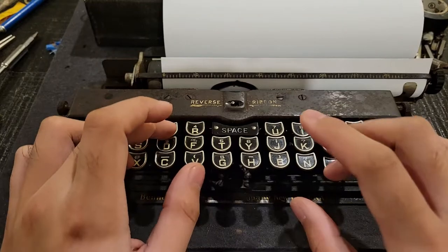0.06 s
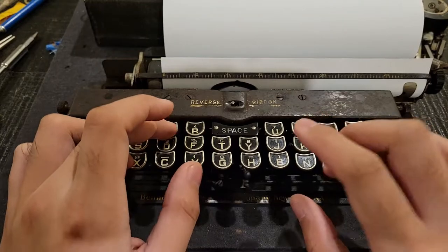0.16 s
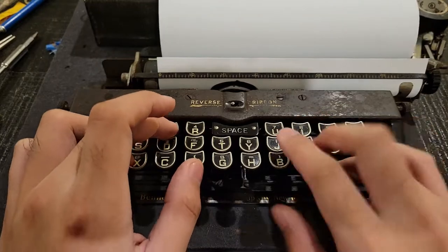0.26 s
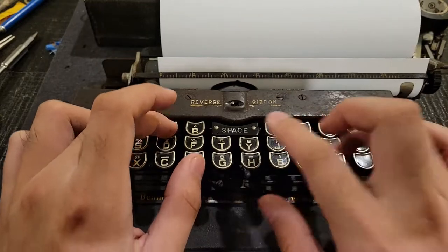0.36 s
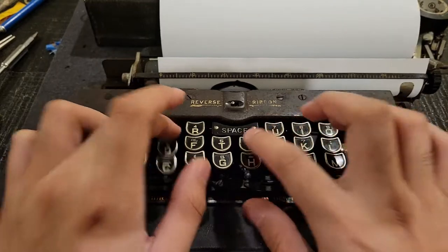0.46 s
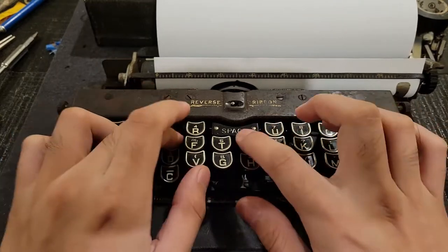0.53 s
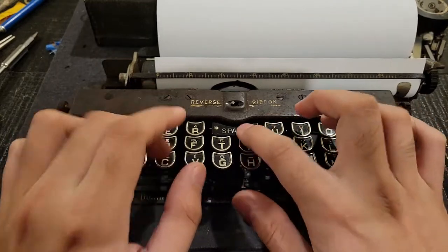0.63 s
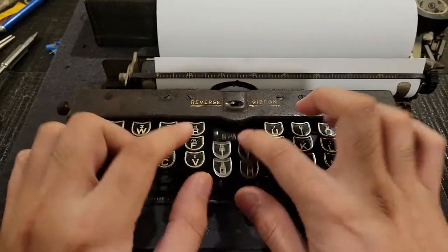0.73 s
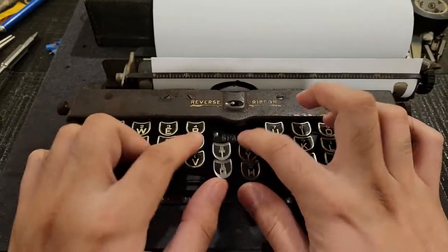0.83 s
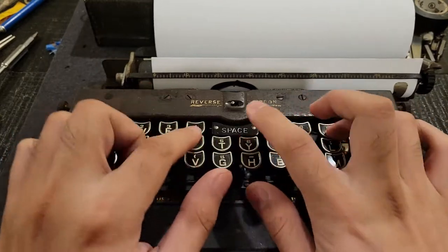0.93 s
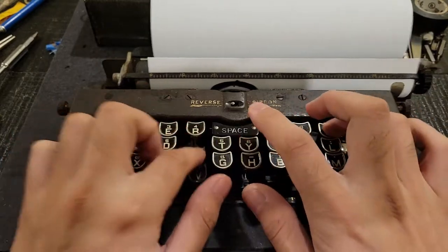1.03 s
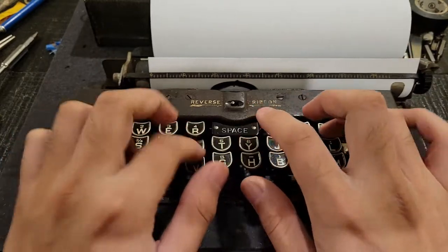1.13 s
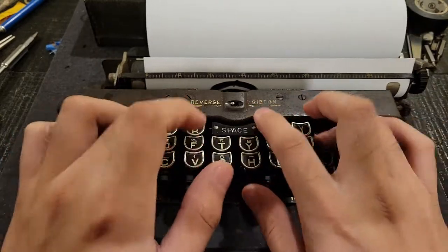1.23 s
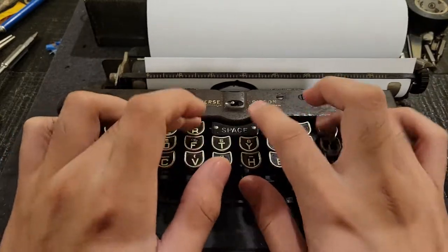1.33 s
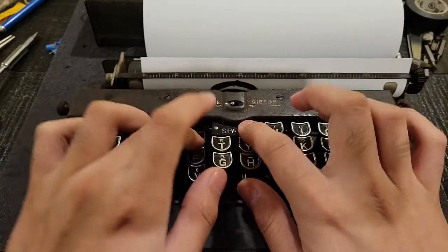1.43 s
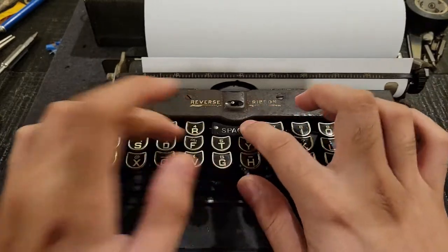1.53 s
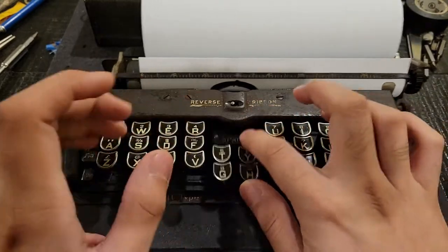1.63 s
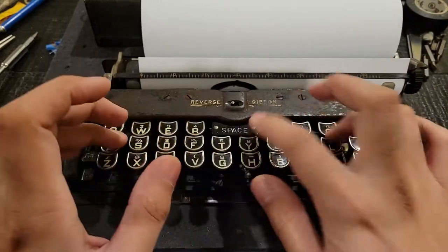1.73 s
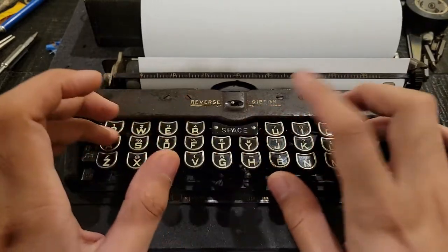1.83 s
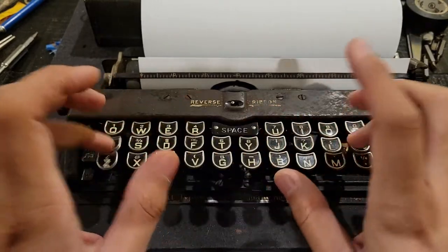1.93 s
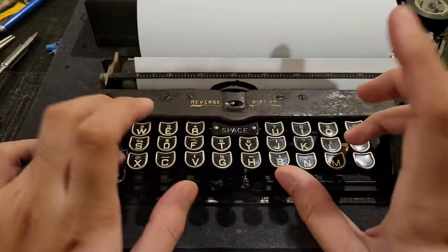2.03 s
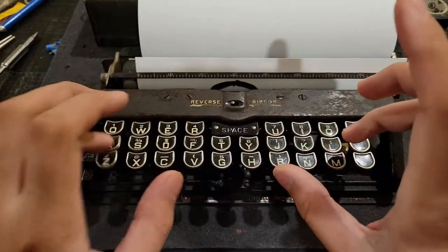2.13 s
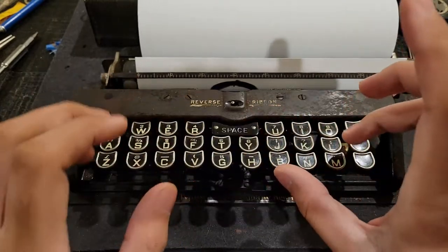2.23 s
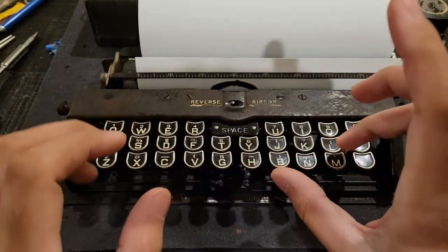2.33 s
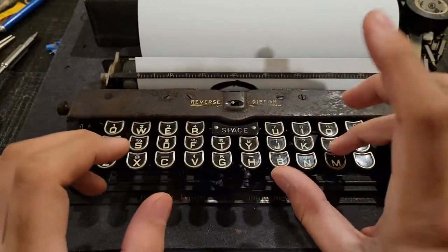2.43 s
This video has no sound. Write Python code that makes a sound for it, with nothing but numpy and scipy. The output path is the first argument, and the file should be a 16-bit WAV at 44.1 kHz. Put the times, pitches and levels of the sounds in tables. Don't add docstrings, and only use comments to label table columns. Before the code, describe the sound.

An old mechanical typewriter typed quickly, sharp metallic clacks in a small quiet room, close up

```python
import sys
import numpy as np
from scipy import signal
from scipy.fft import rfft, irfft
from scipy.io import wavfile
from scipy.ndimage import uniform_filter1d

SR = 44100
rng = np.random.default_rng(int(sys.argv[2]) if len(sys.argv) > 2 else 0)


def volts_from_decibels(level):
    exponent = np.asarray(level, float) / 20
    return 10 ** exponent


def materialize(psi):
    bounded = np.clip(np.atleast_2d(psi).T, -1, 1)
    quanta = np.round(bounded * 32767).astype(np.int16)
    wavfile.write(sys.argv[1], SR, quanta)


N = 110250

# (frequency [Hz], level [dB])
FLOOR_SPECTRUM = [(15, -41), (25, -3.5), (111, -3), (263, -16), (416, -18.5), (591, -30.5), (1840, -33.5),
                  (10700, -45.5), (16000, -39)]
# (time [s], peak [dB], treble tilt [dB per octave], chatter length [s])
LEVER_TICKS = [(0.0225, -25, -2.5, 0.012), (0.1948, -27.5, -2.5, 0.0032), (0.3425, -22, -0.5, 0.0098),
               (0.402, -22, -11, 0.0097), (0.4562, -10, -2.5, 0.0073), (0.4712, -16.5, 2, 0.005),
               (0.5198, -14, -11, 0.0031), (0.4937, -17, -2.5, 0.011), (0.5442, -9.5, -3, 0.0088),
               (0.6, -15.5, -2.5, 0.0062), (0.6755, -15.5, -3, 0.0076), (0.7435, -32, -4, 0.0043),
               (0.7545, -10, 0.7, 0.0061), (0.8045, -20, -5, 0.0054), (0.8775, -22.5, 8, 0.0054),
               (0.7943, -9.5, -1.3, 0.0088), (1.0222, -18.5, 10.5, 0.0036), (1.0307, -10, 1, 0.0055),
               (1.0434, -10.5, -10.5, 0.0019), (1.1353, -16, 0.5, 0.004), (1.0742, -15, -11, 0.0022),
               (1.1912, -12, -11.5, 0.0037), (1.2472, -6.5, -5, 0.0033), (1.2085, -8.5, 0.5, 0.0056),
               (1.2302, -7, -4.5, 0.0034), (1.2702, -13.5, 3.5, 0.0054), (1.3264, -22, -6, 0.0087),
               (1.3502, -16, 0, 0.0021), (1.3755, -15.5, -5, 0.004), (1.4305, -9.5, -5.5, 0.004),
               (1.5105, -17, -2, 0.0021), (1.572, -15, 1, 0.0056), (1.634, -11.5, 2.5, 0.0075),
               (1.672, -10, 0.5, 0.0079), (1.7225, -19.5, 3, 0.006), (1.7355, -22, 7.5, 0.0032),
               (1.6855, -13, 2.5, 0.0057), (1.961, -20, -2, 0.0063), (2.0042, -8.5, 0.3, 0.0014),
               (2.0262, -15.5, 2.5, 0.0068), (2.103, -21.5, -2, 0.013), (2.4895, -47, -0.5, 0.0057)]
# (time [s], peak [dB], treble tilt [dB per octave], chatter length [s])
TYPE_STRIKES = [(0.2195, -15.5, -4, 0.0055), (0.2372, -10, -1.5, 0.0042), (0.2465, -13.5, 3, 0.0026),
                (0.3612, -15, -1, 0.0052), (0.4192, -8, -0.5, 0.0021), (0.5252, -9, 2, 0.0051),
                (0.623, -9.5, 3, 0.0073), (0.6564, -11.5, 0.5, 0.0049), (0.7705, -10.5, -3, 0.0035),
                (0.8895, -11, 2, 0.003), (1.0512, -7.5, -0.7, 0.0047), (1.0688, -6.5, -0.3, 0.0033),
                (1.1632, -9, 2, 0.0017), (1.1858, -9.5, 0.5, 0.0036), (1.2402, -12.5, 0.5, 0.0062),
                (1.2532, -6, 3, 0.0021), (1.3458, -13, -1.5, 0.0024), (1.3915, -6.5, 0.3, 0.003),
                (1.418, -14.5, 1.9, 0.011), (1.4405, -11, 0.5, 0.003), (1.4566, -12.5, -2.2, 0.0067),
                (1.535, -7, 1.9, 0.0026), (1.5473, -12.5, -2.3, 0.0081), (1.6495, -12, -3.5, 0.0026),
                (1.7432, -9, 2, 0.0026), (1.9991, -13, -2.5, 0.0045), (2.0152, -3.5, 1.9, 0.0034),
                (2.1195, -12, 0, 0.0028), (2.1722, -9, -0.5, 0.0038), (2.21, -15, -0.4, 0.0042)]
# (frequency [Hz], level [dB])
STEEL_SPECTRUM = [(530, -16.5), (900, -3), (1220, -15.5), (1470, -7.5), (1770, -8.5), (4150, -3),
                  (11100, -9), (13800, -10), (16000, -4.5)]
# (frequency [Hz], time to fall 60 dB [s])
STEEL_DECAY = [(1000, 0.027), (4000, 0.012), (14000, 0.0065)]
# (frequency [Hz], time to fall 60 dB [s])
ROOM_DECAY = [(150, 0.34), (700, 0.21), (2000, 0.25), (5000, 0.14), (13000, 0.17)]
# (time [s], peak [dB], desk share [dB])
KEY_THUMPS = [(0.035, -42, -18), (0.247, -15.5, -22.5), (0.256, -24.5, -30), (0.342, -31.5, -26),
              (0.422, -23.5, -31), (0.522, -18.5, -10), (0.549, -18, -18), (0.658, -24, -18.5),
              (0.765, -21.5, -8), (0.796, -15.5, -22), (0.89, -22, -17.5), (1.029, -28, -11),
              (1.045, -20.5, -19), (1.071, -16.5, -31), (1.163, -29, -9.5), (1.19, -22.5, -16.5),
              (1.232, -20, -12.5), (1.243, -23.5, -29), (1.254, -17.5, -17), (1.375, -23, -17),
              (1.434, -22.5, -15), (1.456, -19.5, -16.5), (1.544, -20.5, -19), (1.641, -22.5, -7),
              (1.676, -15, -20.5), (1.688, -25, -30), (1.744, -25, -25), (1.963, -35.5, -14),
              (2.002, -25, -8), (2.016, -21.5, -26.5), (2.027, -18.5, -16), (2.173, -26.5, -28.5),
              (2.21, -31, -17)]
# (frequency [Hz], level [dB], time to fall 60 dB [s])
FRAME_TONES = [(318, -3.5, 0.012), (387, 4, 0.02), (480, -5.5, 0.025), (580, -7.5, 0.018), (698, -5, 0.018),
               (775, -0.5, 0.033), (890, 3, 0.0079), (1040, -2.5, .012)]
# (frequency [Hz], level [dB], time to fall 60 dB [s])
DESK_TONES = [(58.5, -2, 0.13), (87.5, 2, 0.11), (104, -3.5, 0.14), (123.6, -4.5, 0.33), (154, -5.5, 0.11),
              (186, -5.5, 0.053)]
# (time [s], frequency [Hz], level [dB], time to fall 60 dB [s])
RINGING_BARS = [
    (0.4192, 1550, -16, 0.009),
    (0.8895, 4220, -22, .007),
    (1.7432, 2150, -16, 0.005),
    (1.9572, 13550, -16, 0.005),
    (1.5358, 8100, -14, 0.004),
    (2.1195, 1550, -14, 0.008),
    (2.1195, 1900, -13, 0.008),
    (2.1722, 1600, -13, 0.009),
    (2.1722, 2115, -14, 0.008),
]
# (start [s], stopped at [s], frequency [Hz], level [dB], time to fall 60 dB [s])
SPRING_TONE = (1.745, 1.95, 872, -48, .9)

RISE_S, RISE_SHARE = 0.0002, 0.35
BEFORE = 1000


def read(points, hz):
    f, value = np.transpose(points)
    return np.interp(np.log(hz + 1), np.log(f + 1), value)


def add(mix, s, sound):
    part = mix[:, max(round(s * SR), 0):][:, :sound.shape[1]]
    part += sound[:, :part.shape[1]]


def highpass(sound, order, hz):
    return signal.sosfilt(signal.butter(order, hz, "high", fs=SR, output="sos"), sound)


def floor():
    hz = np.fft.rfftfreq(N, 1 / SR)
    a, b = rfft(rng.standard_normal((2, N)))
    same = 0.95 / (1 + hz / 2500)
    right = same * a + np.sqrt(1 - same ** 2) * b
    x = irfft(np.array([a, right]) * volts_from_decibels(read(FLOOR_SPECTRUM, hz)), N)
    return volts_from_decibels(-63) * x / x.std()


def ring(hz, db, t60, size, alternate=True):
    left_db, bass_spread_db, lag_s = 0.5, 3.5, 0.00009
    t = np.arange(size) / SR
    chance = rng.standard_normal((2, len(hz)))
    unlike = 1 / (1 + (1207 / hz) ** 2)
    sign = (-1.) ** (alternate * np.arange(len(hz)))
    left = volts_from_decibels(db) * sign * np.exp(0.4j * unlike * chance[0])
    right_db = -left_db * np.minimum(hz / 300, 1) + bass_spread_db * (1.5 - unlike) * chance[1]
    right_phase = 1.3 * unlike * chance[1] - 2 * np.pi * hz * lag_s
    right = left * volts_from_decibels(right_db) * np.exp(1j * right_phase)
    fall = np.log(1000) / np.maximum(t60, 0.002)
    waves = np.exp(np.outer(2j * np.pi * hz - fall, t))
    return (np.array([left, right]) @ waves).imag


def chatter(length, rattle_db, travel_db):
    rattle_s, travel_s = 0.02, 0.0086
    t = (np.arange(4000) - BEFORE) / SR
    late = np.maximum(t, 0)
    length = max(length, 0.0005)
    rise = RISE_S + RISE_SHARE * length
    bunch = np.exp(-(late / (1.364 * length)) ** 1.68)
    rattle = volts_from_decibels(rattle_db) * np.exp(-late / rattle_s)
    shape = np.minimum(late / rise, 1) * (bunch + rattle)
    shape += volts_from_decibels(travel_db) * np.exp(-np.abs(t) / travel_s)
    sign, gate = rng.standard_normal((2, 3, len(t)))
    hits = sign * (gate > 0.9)
    hits[0, BEFORE + round(rise * SR)] = 2.05
    clumps = volts_from_decibels(23.0 * uniform_filter1d(rng.standard_normal(len(t)), size=60))
    return shape * clumps * (hits[0] + hits[1:])


def clack(peak_db, tilt_db, length, travel_db):
    hz = np.linspace(900, 16000, 90) + rng.uniform(-80, 80, 90)
    spread_db = 5.3 * rng.standard_normal(90)
    db = read(STEEL_SPECTRUM, hz) + tilt_db * np.log2(hz / 4000) + spread_db
    steel = ring(hz, db, read(STEEL_DECAY, hz), size=500, alternate=False)
    sound = signal.fftconvolve(steel, chatter(length, rattle_db=-13.5, travel_db=travel_db), axes=1)
    sound = highpass(sound, 2, 550)
    loudness = np.sqrt((sound[:, 1000:1250] ** 2).mean())
    return volts_from_decibels(peak_db) * sound / (3 * loudness)


def room(x):
    taps = np.zeros((2, 22000))
    at = np.arange(200, 21980, 20) + rng.integers(0, 20, (2, 1089))
    np.put_along_axis(taps, at, rng.choice([-1., 1.], at.shape), 1)
    hz, t, z = signal.stft(taps, SR, nperseg=256)
    fall_db = -60 * t / read(ROOM_DECAY, hz)[:, None]
    fade = volts_from_decibels(fall_db) + volts_from_decibels(-17.5 + fall_db / 2.7)
    tail = signal.istft(z * fade, SR, nperseg=256)[1]
    return signal.fftconvolve(x, tail / np.linalg.norm(tail[0]), axes=1)[:, :N]


def thump(peak_db, desk_db):
    out, t = 0, np.arange(1500) / SR
    push = np.exp(-t / 0.0075) * rng.standard_normal(1500) * (rng.random(1500) < 0.06)
    # tones, level [dB], rise [s], lowest pitch [Hz]
    parts = ((FRAME_TONES, 0.5, 0.003, 260), (DESK_TONES, desk_db, 0.035, 45))
    for tones, level_db, rise_s, low_hz in parts:
        hz, db, t60 = np.transpose(tones)
        chance = rng.standard_normal((2, len(hz)))
        body = ring(hz * (1 + 0.022 * chance[0]), db + 2.53 * chance[1], t60, size=14000)
        body = body * np.hanning(28000)[14000:]
        body = signal.fftconvolve(body, push[None], axes=1)
        swell = np.minimum(np.arange(body.shape[1]) / SR / rise_s, 1)
        body *= np.sin(np.pi / 2 * swell) ** 2
        body = highpass(body, 3, low_hz)
        out = out + volts_from_decibels(level_db) * body / np.abs(body).max()
    return volts_from_decibels(peak_db) * out


def bar(hz, db, t60):
    tones = ring(hz * np.array([0.994, 1.006]), np.zeros(2), t60, size=1500)
    sound = signal.fftconvolve(tones, chatter(0.002, rattle_db=-30, travel_db=-70), axes=1)
    sound = highpass(sound, 2, hz / 2)
    return volts_from_decibels(db) * sound / np.abs(sound).max()


def spring():
    start, stop, hz, db, t60 = SPRING_TONE
    t = np.arange(N) / SR
    on = np.clip((t - start) / 0.012, 0, 1) * np.clip((stop - t) / 0.019, 0, 1)
    return on * volts_from_decibels(db - 60 * np.abs(t - start) / t60) * np.sin(2 * np.pi * hz * t)


def scene():
    lead_s = 0.001095 + BEFORE / SR
    mix = np.zeros((3, 2, N))
    # blows, level change [dB], scrape on the way [dB]
    for table, trim_db, travel_db in ((LEVER_TICKS, -3, -14), (TYPE_STRIKES, 3.5, -17)):
        for k, (s, peak_db, tilt_db, length) in enumerate(table):
            add(mix[k % 3], s - lead_s, clack(peak_db + trim_db, tilt_db, length, travel_db))
    for k, (s, peak_db, desk_db) in enumerate(KEY_THUMPS):
        add(mix[k % 3], s - 0.002, thump(peak_db, desk_db))
    close = np.zeros((2, N))
    for s, hz, db, t60 in RINGING_BARS:
        add(close, s - lead_s, bar(hz, db, t60))
    machine = sum(part + volts_from_decibels(-11.5) * room(part) for part in mix)
    return machine + close + spring() + floor()


def band_limit(x):
    return signal.sosfilt(signal.butter(12, 16970, fs=SR, output="sos"), x)


def record(dry):
    soft = np.tanh(dry)
    x = signal.oaconvolve(soft, signal.firwin(255, 15900, fs=SR)[None], "same")
    return band_limit(x)


dry = scene()
out = record(dry)
materialize(out)
```